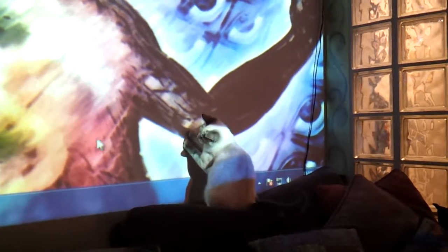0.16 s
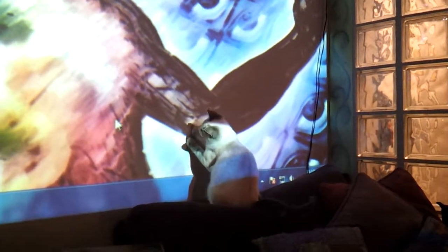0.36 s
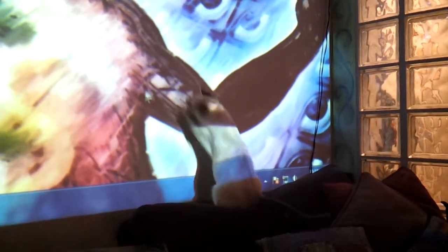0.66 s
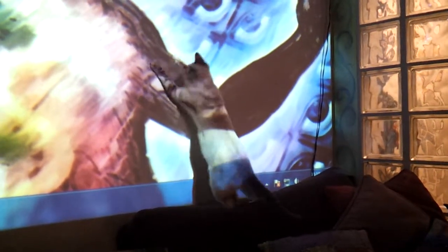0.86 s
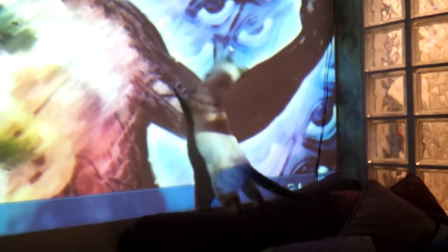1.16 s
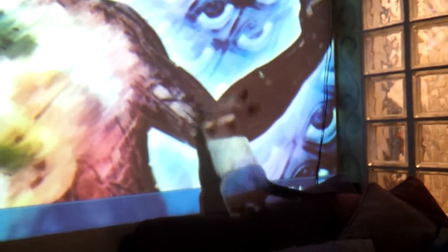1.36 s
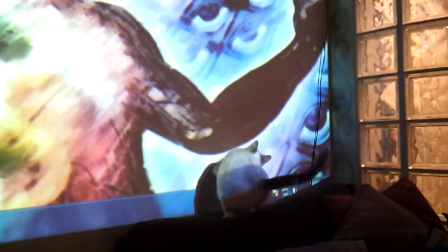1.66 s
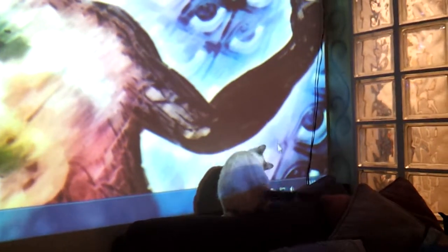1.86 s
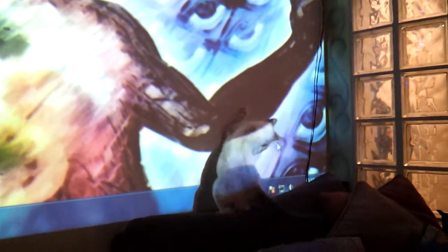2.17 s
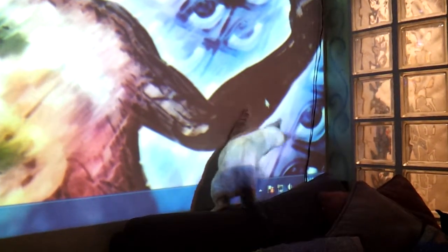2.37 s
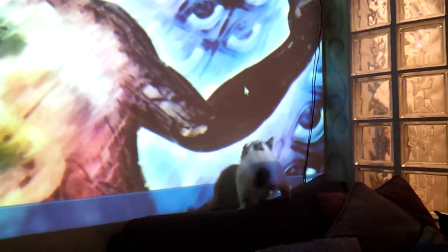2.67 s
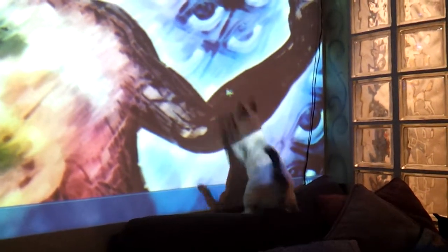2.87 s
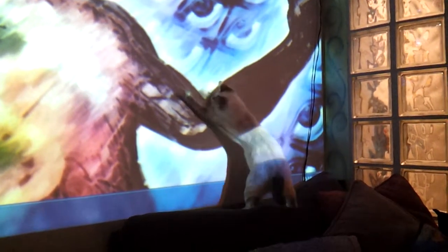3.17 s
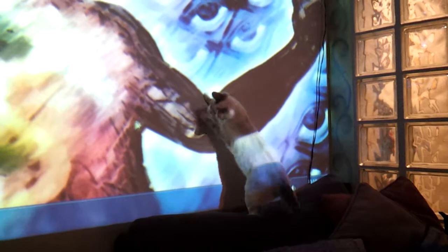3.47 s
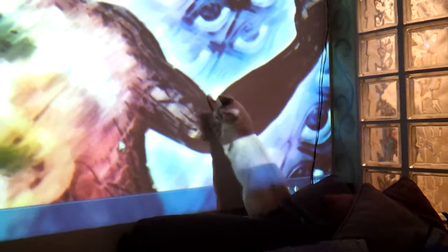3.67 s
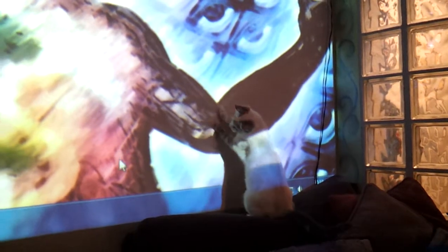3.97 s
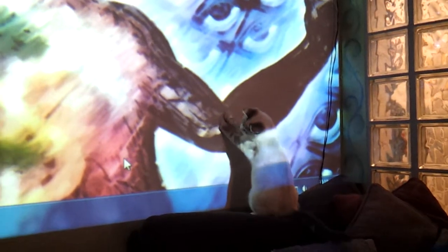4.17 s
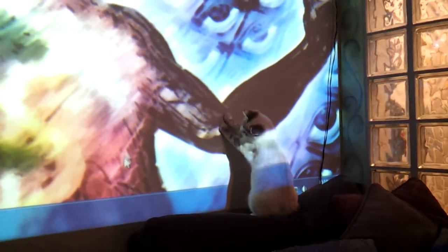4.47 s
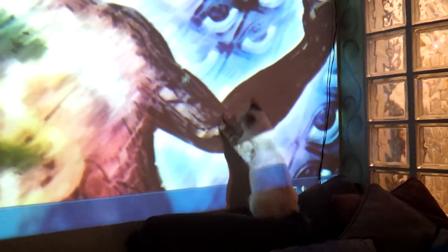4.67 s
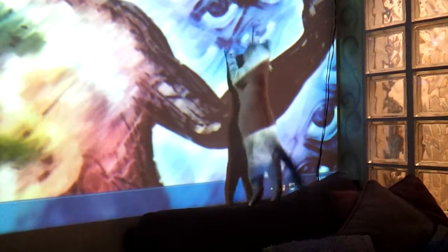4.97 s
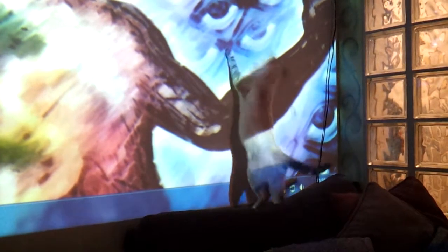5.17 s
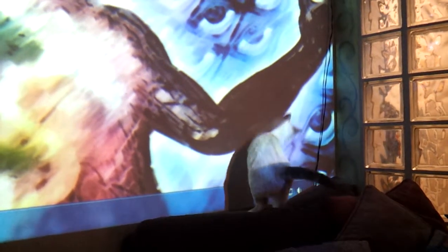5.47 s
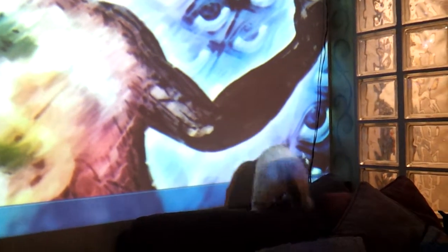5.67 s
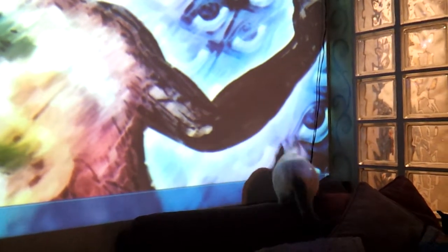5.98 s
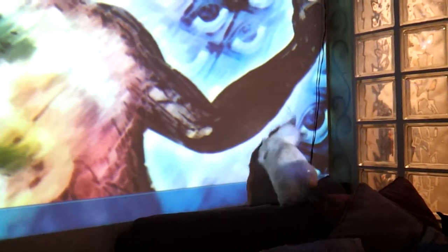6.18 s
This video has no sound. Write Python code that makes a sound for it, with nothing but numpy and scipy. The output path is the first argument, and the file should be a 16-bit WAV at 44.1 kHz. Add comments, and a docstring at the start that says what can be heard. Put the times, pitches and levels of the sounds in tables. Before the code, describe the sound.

Soft fan rush with a faint hum and whine runs throughout. At some distance, cat paws pat and scratch woven screen material in two flurries, bright and dry, with dull fabric thumps and a longer raspy drag in the first. Muffled sofa footfalls come between. Near the microphone, a small finger rub precedes the second flurry, and a sharp plastic button click with a quieter release comes near its end, with short room reflections.

```python
"""A cat's paws tap and brush a projection screen in a quiet room as it chases the mouse pointer.
Each touch is a burst of tiny slips coloured by the weave; low modes make the fabric thump softly.
Claws slide down the weave as longer friction; soft knocks of band noise are feet on a sofa and its frame.
Close to the microphone a finger rubs a mouse button, which clicks down and up: a snap and ringing modes.
Behind it all runs a projector fan: steady filtered noise with narrow bands of hum and whine."""
import sys
import numpy as np
from scipy import signal
from scipy.fft import rfft, irfft
from scipy.io import wavfile
from scipy.ndimage import uniform_filter1d

SR = 44100
rng = np.random.default_rng(int(sys.argv[2]) if len(sys.argv) > 2 else 0)


def wav_record(signal):
    """Record a signal, one row per channel, as 16-bit PCM in the file named by sys.argv[1]."""
    frames = np.transpose(np.atleast_2d(signal))
    bounded = np.clip(frames, -1, 1)
    # unit amplitude maps onto the largest positive 16-bit level
    quanta = np.round(bounded * 32767).astype(np.int16)
    wavfile.write(sys.argv[1], SR, quanta)


N = 279163
T = np.arange(N) / SR   # time in seconds

# Spectra of the sources, shape only: freq_hz, relative density_db (per Hz)
FAN_AIR_SPECTRUM = [(20, -13.5), (70, -12.5), (120, -5.5), (190, -4.5), (280, -9.5), (600, -11),
                    (1000, -15), (2000, -18.5), (3000, -22.5), (5000, -23), (7000, -22.5), (10000, -27.5),
                    (16000, -28)]
FINGER_RUB_SPECTRUM = [(600, -7), (1600, -5), (2050, 3), (2500, -5), (3500, -13), (5400, -8), (6300, -1),
                       (7300, -13), (11000, -23)]
SWITCH_SNAP_SPECTRUM = [(150, -20), (320, -6), (520, 1), (800, -3), (1400, 2), (2200, -0.5), (2900, -0.5),
                        (4300, 1), (6900, -2), (8000, -9), (9500, -22), (15000, -38)]
PAD_PAT_SPECTRUM = [(60, -5), (300, -4), (1500, -11), (4000, -13), (9000, -55)]
PAD_RASP_SPECTRUM = [(350, -19), (700, -8), (1500, -2), (2400, 1), (3600, 1.5), (5000, -1.5), (7000, -28)]
WEAVE_SPECTRUM = [(2000, -28.5), (3000, -16.5), (3700, -10), (4400, -5.5), (5400, -4), (6500, 1.5),
                  (7500, -1), (8600, -7), (10000, -11.5), (12500, -15.5), (16000, -31)]

# Fan hum and whine: pitch_hz, width_hz, level_db
FAN_TONES = [(191.9, 6.6, -71.5), (352.3, 13, -77.5), (549, 18, -79.5), (876, 5.5, -80), (6070, 20, -84),
             (6640, 36, -86), (6900, 1100, -80.5)]
# Mouse button, down and up: start_s, snap_db (before the snap gain), shell_db, spring_db,
# dulling_db (tilt per octave), shell_pitch_hz
BUTTON_CLICKS = [(5.378, -23.5, -27, -25.5, -0.5, 1518), (5.6216, -39, -38, -41, -3, 1601)]
# Modes of the button shell: pitch_ratio (times shell_pitch_hz), relative level_db, t60_s
SHELL_MODES = [(0.358, -6, 0.11), (0.652, -15.5, 0.18), (0.784, -10, 0.17), (0.893, -5.5, 0.15),
               (.94, 2, 0.059), (1.001, -0.5, 0.16), (1.046, -5, 0.15), (1.109, -17.5, 0.055),
               (1.19, 0, 0.046), (1.426, -16, 0.18), (1.79, -12, 0.092)]
# Modes of the switch spring: pitch_hz, relative level_db, t60_s
SPRING_MODES = [(6100, -8, 0.034), (6225, -5, 0.08), (6272, 2, 0.12), (6380, -2, 0.048)]
# Feet on the sofa and its frame: start_s, level_db, pitch_hz, fade_s
SOFA_STEPS = [(0.955, -58, 1170, 0.015), (1.262, -60, 685, .012), (2.548, -59, 170, 0.042),
              (2.66, -60, 330, 0.055), (2.824, -52.5, 200, 0.027), (2.830, -57, 450, .026),
              (6.043, -55, 910, .016)]
# Low modes of the stretched screen: pitch_hz, relative level_db, t60_s
SCREEN_MODES = [(55.7, -18, 0.15), (66, 6.5, 0.14), (84, -4, .13)]
# Paw dragged down the weave: start_s, length_s (until let go), claw_hiss_db, pad_rasp_db
PAW_DRAGS = [(1.498, 0.14, -46.5, -78), (1.817, .13, -68, -66), (2.248, 0.3, -49.3, -51.5)]
# Paw strikes the screen: start_s, level_db (before the paw gain), fade_s,
# brightness_db (tilt per octave), thump_db (of the fabric)
PAW_TAPS = [(0.780, -46, 0.0043, -2, -52.5), (0.8142, -50, 0.017, -2, -54),
            (1.034, -41, 0.0095, 2.5, -44.5), (1.447, -37.5, 0.016, -.5, -75),
            (2.9594, -33.5, .006, 8, -52.5), (3.082, -47, .027, 5.5, -75),
            (3.208, -35.5, 0.0027, -1.5, -54), (4.978, -43, 0.0062, -4.5, -48)]
# Paw brushes the screen in passing: start_s, level_db (before the paw gain), length_s,
# brightness_db (tilt per octave)
PAW_BRUSHES = [(0.688, -62, .025, 2), (0.921, -55.5, 0.041, -3), (1.162, -55, 0.021, 7),
               (1.292, -57.5, 0.037, 3), (1.352, -50.5, .021, 0), (1.413, -44, 0.035, 6),
               (2.168, -55, 0.042, 0), (2.83, -60, 0.013, -13), (3.138, -55, 0.025, 2),
               (3.838, -54.5, 0.015, -1), (4.787, -51.5, 0.012, -1), (4.926, -52.5, 0.0086, 2),
               (5.081, -54.5, .011, 4), (5.257, -55, 0.03, 4), (5.446, -59, .014, 17),
               (6.115, -53, 0.018, 2.5)]

FAN_AIR_DB = -61
FINGER_START_S, FINGER_LENGTH_S, FINGER_DB = 4.572, 0.083, -59
FINGER_RISE_S, FINGER_FADE_S = 0.029, 0.018
GRIP_S, LET_GO_S = 0.12, 0.017   # the weight comes onto the dragged paw, and off it
PAD_SLIP_S = 0.078   # fade of the pad's rasp after full grip
TAP_RISE_S = 0.00096
BRUSH_RISE_SHARE = 0.45   # part of a brush's length spent swelling; the rest sets its fade
CUTOFF_HZ = 15700


def from_db(db):
    """Decibels to amplitude."""
    return 10 ** (np.asarray(db) / 20)


def rms_one(x):
    """Scales a sound to rms 1."""
    return x / np.sqrt(np.mean(x ** 2) + 1e-20)


def convolve(x, h):
    """Filters a sound by an impulse response, keeping its length."""
    return signal.fftconvolve(x, h)[:len(x)]


def high_pass(x, hz):
    """Removes the rumble below a frequency."""
    return signal.sosfilt(signal.butter(2, hz, "high", fs=SR, output="sos"), x)


def response(spectrum, tilt_db=0, size=4096):
    """Causal (minimum-phase) impulse response of a spectrum tilted per octave; energy 1."""
    hz, db = np.transpose(spectrum)
    octave = np.log2(np.maximum(np.fft.rfftfreq(size, 1 / SR), 1))
    level_db = np.interp(octave, np.log2(hz), db + tilt_db * np.log2(hz))
    cepstrum = irfft(np.log(from_db(level_db)))
    # folding the cepstrum forward in time gives minimum phase
    cepstrum[1:size // 2] *= 2
    cepstrum[size // 2 + 1:] = 0
    h = irfft(np.exp(rfft(cepstrum)))
    return h / np.linalg.norm(h)


def band_noise(hz, width_hz):
    """Noise in one resonance; rms 1."""
    band = [max(hz - width_hz / 2, 15), hz + width_hz / 2]
    sos = signal.butter(2, band, "band", fs=SR, output="sos")
    settled = signal.sosfilt(sos, rng.standard_normal(N + SR))[SR:]
    return rms_one(settled)


def friction(grain_db, size=N):
    """Dense tiny slips of random sign and uneven strength; rms 1."""
    signs = rng.choice([-1, 1], size)
    unevenness = np.minimum(rng.exponential(1, size), 6)
    return rms_one(signs * from_db(grain_db * unevenness))


def swell(t, rise, fade):
    """Rises to 1, then dies away."""
    return np.clip(t / rise, 0, 1) * np.exp(-np.maximum(t - rise, 0) / fade)


def stroke(s, length, rise, fade):
    """A rubbing movement: builds up, holds to the end of its length, dies away."""
    return np.clip((T - s) / rise, 0, 1) * np.exp(-np.maximum(T - s - length, 0) / fade)


def slow_start(t, build_s):
    """Smooth build-up of a resonance from rest."""
    return 1 - np.exp(-(t / build_s) ** 2)


def add(track, s, sound):
    """Mixes a sound in at a time."""
    at = int(s * SR)
    track[at:at + len(sound)] += sound[:N - at]


def even(burst, size=200):
    """Smooths out the broad colour of a burst and keeps its grain and energy."""
    spectrum = rfft(burst)
    power = uniform_filter1d(np.abs(spectrum) ** 2, size) + 1e-20
    return irfft(spectrum * np.sqrt(power.mean() / power))


def disperse(x, hz, width_hz):
    """All-pass: a body holds back the frequencies near hz for a moment."""
    r = np.exp(-np.pi * width_hz / SR)
    a = [1, -2 * r * np.cos(2 * np.pi * hz / SR), r * r]
    return signal.lfilter(a[::-1], a, x)


def ringing(modes, build_s):
    """Struck modes, each a decaying sine of random phase, that swell briefly and die away."""
    t = T[:SR // 2]
    tones = np.zeros(len(t))
    for hz, db, t60 in modes:
        tones += from_db(db - 60 * t / t60) * np.sin(2 * np.pi * (hz * t + rng.random()))
    return tones * slow_start(t, build_s)


def room(x, early_db, late_db, gap, early_s, t60):
    """Direct sound, a cluster of near reflections and a diffuse tail; keeps the energy."""
    t = np.arange(SR // 2) / SR
    early = rng.standard_normal(len(t)) * (t > gap) * (t < gap + early_s)
    late = rng.standard_normal(len(t)) * (t > gap) * from_db(-60 * t / t60)
    h = from_db(early_db) * early / np.linalg.norm(early)
    h += from_db(late_db) * late / np.linalg.norm(late)
    h[0] = 1   # direct sound
    return convolve(x, h / np.linalg.norm(h))


def fan():
    """Steady rush of air with a blade hum and a thin whine."""
    air = convolve(rng.standard_normal(N + SR), response(FAN_AIR_SPECTRUM))[SR:]
    tones = sum(from_db(db) * band_noise(hz, width) for hz, width, db in FAN_TONES)
    return from_db(FAN_AIR_DB) * air + tones


def finger():
    """A fingertip rubs on the button: one stroke of friction coloured by a fixed spectrum."""
    movement = stroke(FINGER_START_S, FINGER_LENGTH_S, FINGER_RISE_S, FINGER_FADE_S)
    rub = from_db(FINGER_DB) * movement * friction(5.3)
    return convolve(rub, response(FINGER_RUB_SPECTRUM))


def mouse_button(snap_gain_db=22):
    """The switch snaps over, then shell and spring ring up; the desk and walls throw the snap back."""
    snaps, rings = np.zeros((2, N))
    for s, snap_db, shell_db, spring_db, dull_db, shell_hz in BUTTON_CLICKS:
        snap = disperse(response(SWITCH_SNAP_SPECTRUM, dull_db), 3700, 1300)
        snap = disperse(snap, shell_hz, 640)
        add(snaps, s, from_db(snap_db + snap_gain_db) * snap)
        shell_modes = [(shell_hz * ratio, db, t60) for ratio, db, t60 in SHELL_MODES]
        shell = ringing(shell_modes, build_s=0.0067)
        spring = ringing(SPRING_MODES, build_s=0.0045)
        add(rings, s, from_db(shell_db) * shell + from_db(spring_db) * spring)
    rings = room(rings, early_db=-10, late_db=-12, gap=0.006, early_s=0.02, t60=0.38)
    snaps = room(snaps, early_db=-3, late_db=-0.5, gap=0.0018, early_s=0.024, t60=0.34)
    return rings + snaps


def sofa_steps(relative_width=0.96):
    """Soft, padded knocks: short swells of noise in one broad resonance each."""
    out = np.zeros(N)
    for s, db, hz, fade in SOFA_STEPS:
        body = band_noise(hz, min(relative_width * hz, 350))
        out += from_db(db) * swell(T - s, 0.0046, fade) * body
    return out


def screen_thumps(build_s=0.013, pat_db=-11, low_cut_hz=42):
    """The stretched fabric swings up slowly in its low modes; the pad adds a dull pat."""
    out, t = np.zeros(N), T[:SR // 2]
    swing = sum(from_db(db - 60 * t / t60) * np.sin(2 * np.pi * hz * t) for hz, db, t60 in SCREEN_MODES)
    swing = swing * slow_start(t, build_s)
    for s, *_, thump_db in PAW_TAPS:
        contact = friction(1.8, len(t)) * swell(t, 0.0023, 0.018)
        pat = convolve(contact, response(PAD_PAT_SPECTRUM))
        add(out, s, from_db(thump_db) * (swing + from_db(pat_db) * pat))
    return high_pass(out, low_cut_hz)


def claw_slides(catch_db=1.5, rasp_power=2.2):
    """A dragged paw hisses as its claws catch on the threads; the pad rasps lower as it grips, then slips."""
    hiss, rasp = np.zeros((2, N))
    for s, length, hiss_db, rasp_db in PAW_DRAGS:
        pressure = stroke(s, length, GRIP_S, LET_GO_S)
        hiss += from_db(hiss_db) * pressure
        rasp += from_db(rasp_db) * pressure ** rasp_power * swell(T - s, GRIP_S, PAD_SLIP_S)
    catches = from_db(catch_db * band_noise(220, 350))   # flutter shared by claws and pad
    claws = convolve(hiss * catches * friction(4.1), response(WEAVE_SPECTRUM))
    pad = convolve(rasp * catches * friction(5.9), response(PAD_RASP_SPECTRUM))
    return claws + pad


def paws(gain_db=3, low_cut_hz=3000, grain_db=2.5):
    """Bursts of slips over the weave: taps start at once, brushes swell; claw tips sound brighter than pads."""
    lead_s = 0.005   # margin ahead of each touch, since even() smears the grain both ways
    out, t = np.zeros(N), T[:SR // 4] - lead_s
    touches = [(s, db, TAP_RISE_S, fade, bright_db) for s, db, fade, bright_db, _ in PAW_TAPS]
    for s, db, length, bright_db in PAW_BRUSHES:
        rise = BRUSH_RISE_SHARE * length
        touches.append((s, db, rise, length - rise, bright_db))
    for s, db, rise, fade, bright_db in touches:
        slips = even(friction(grain_db, len(t)) * swell(t, rise, fade))
        touch = convolve(slips, response(WEAVE_SPECTRUM, bright_db))
        add(out, s - lead_s, from_db(db + gain_db) * touch)
    return high_pass(out, low_cut_hz)


def scene():
    """One microphone, the same in both channels; the paws and claws carry the room's reflections."""
    background = fan() + finger() + mouse_button() + sofa_steps()
    cat = room(paws() + claw_slides(), early_db=-15, late_db=-2.5, gap=0.00078, early_s=0.015, t60=0.36)
    return np.tile(background + screen_thumps() + cat, (2, 1))


def record(dry):
    """The top is cut steeply."""
    return signal.sosfilt(signal.ellip(12, 0.1, 70, CUTOFF_HZ, fs=SR, output="sos"), dry)


dry = scene()
out = record(dry)
wav_record(out)
```